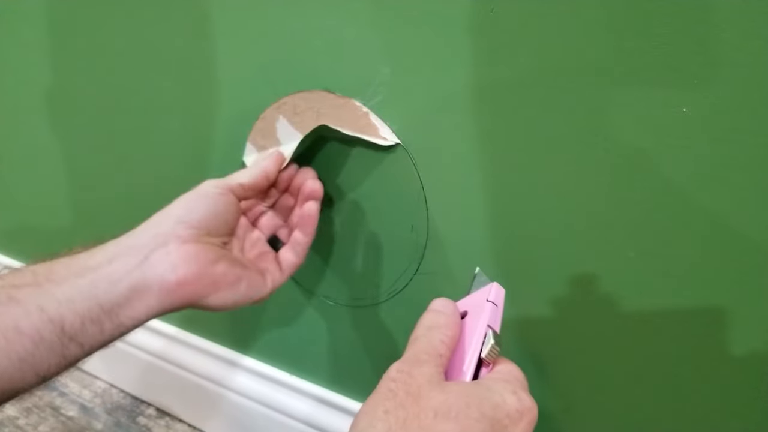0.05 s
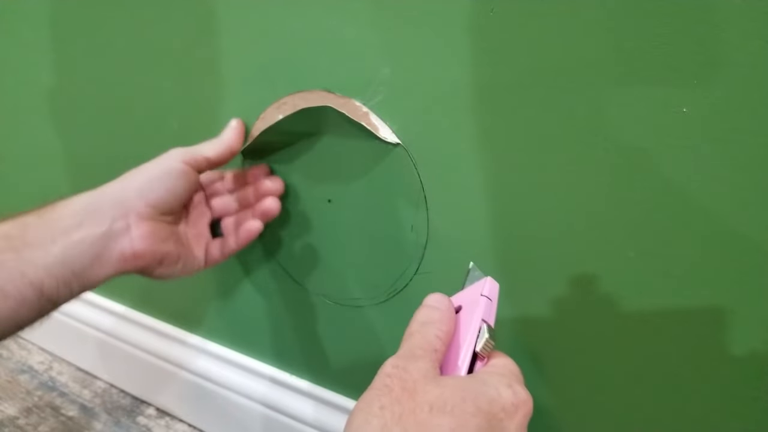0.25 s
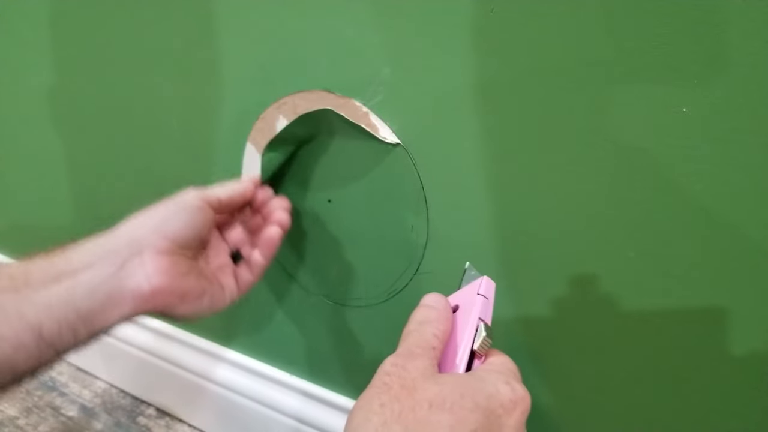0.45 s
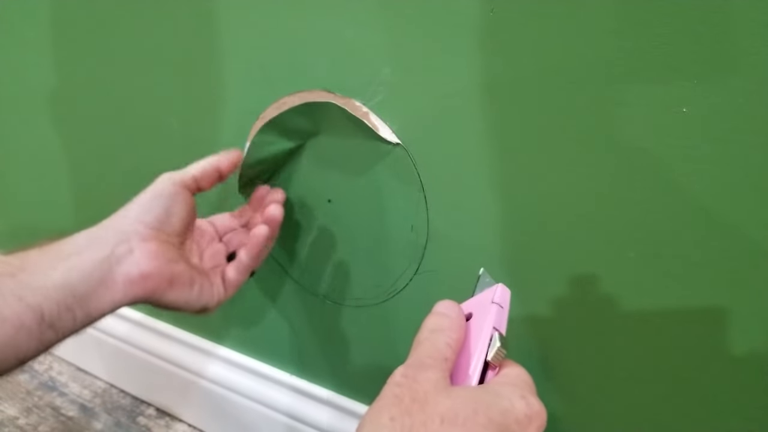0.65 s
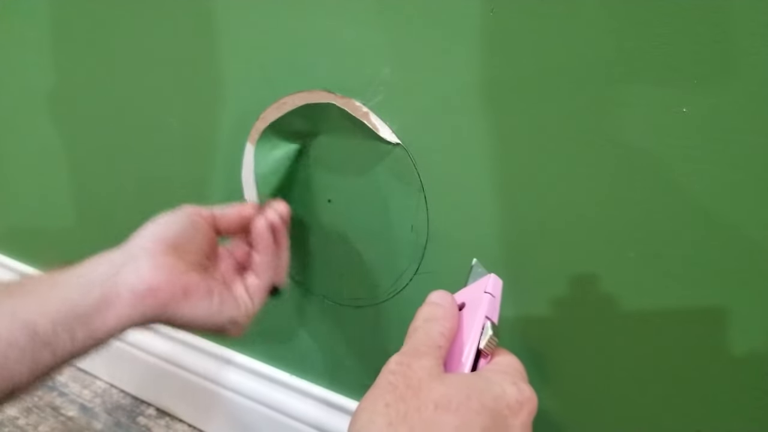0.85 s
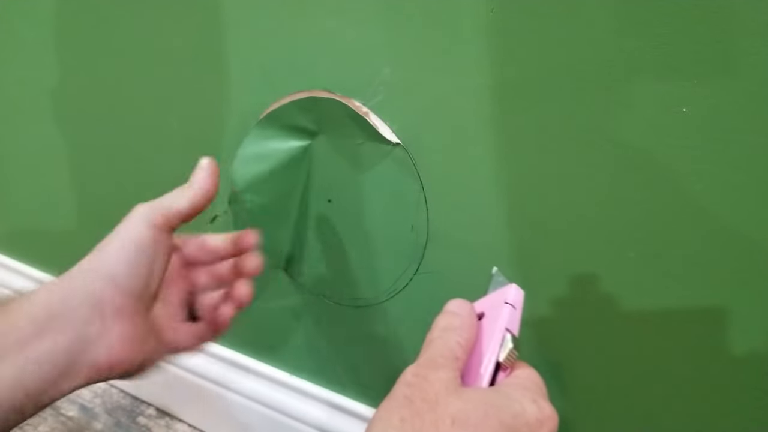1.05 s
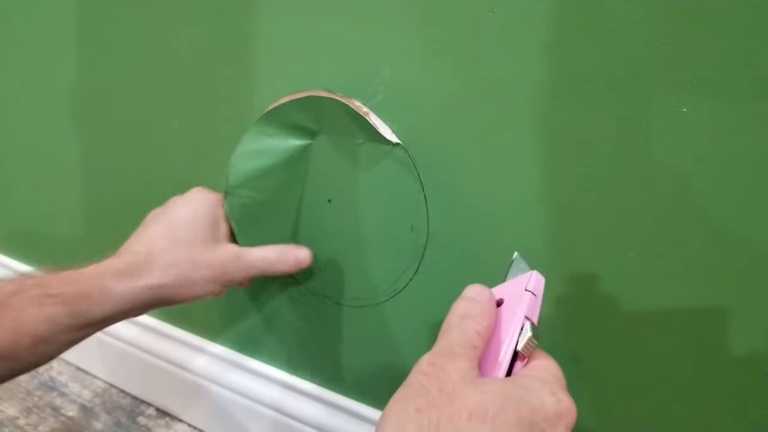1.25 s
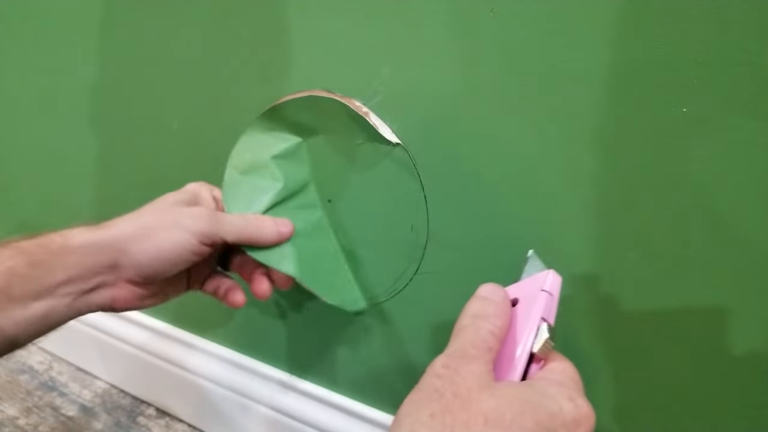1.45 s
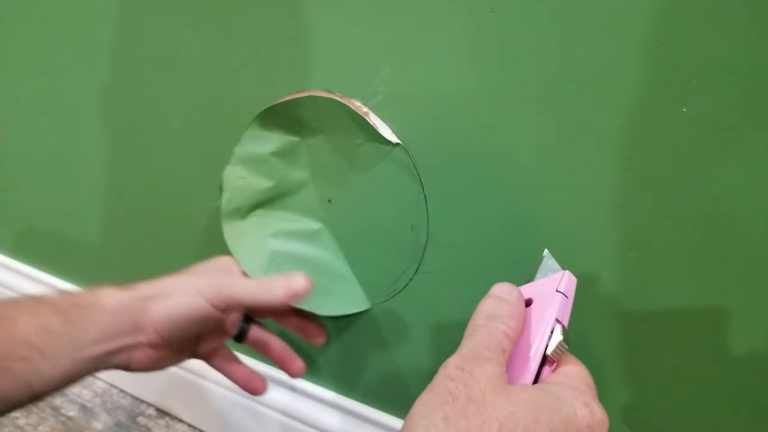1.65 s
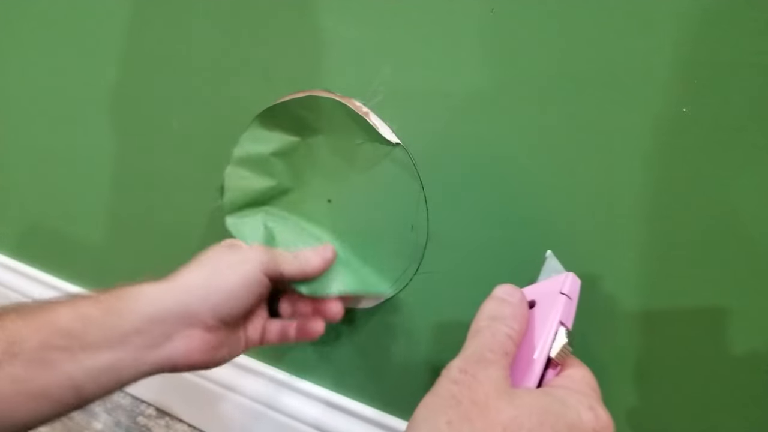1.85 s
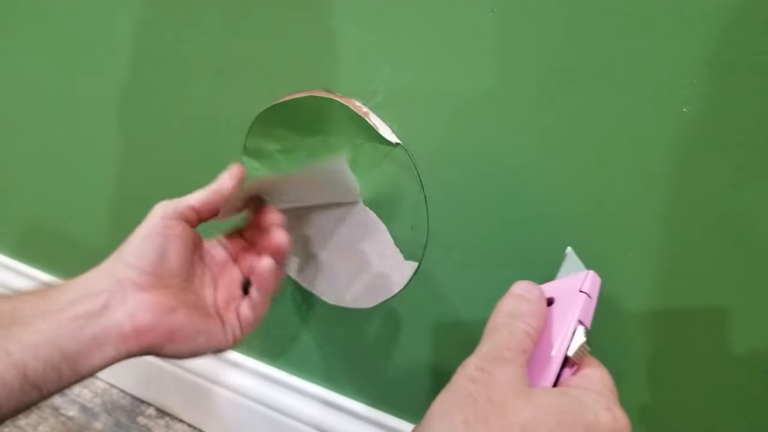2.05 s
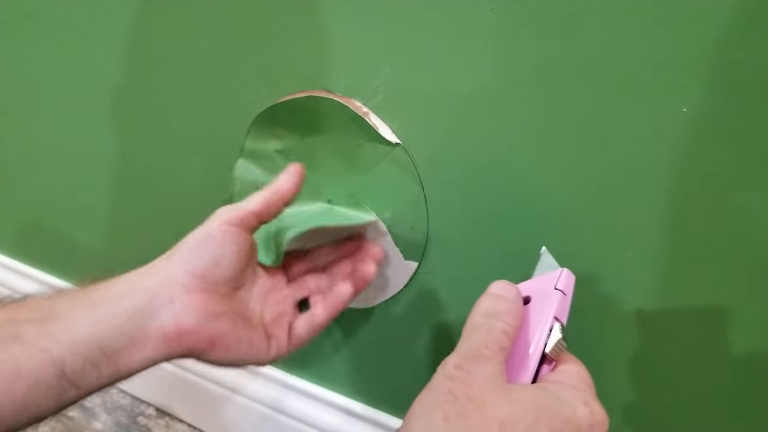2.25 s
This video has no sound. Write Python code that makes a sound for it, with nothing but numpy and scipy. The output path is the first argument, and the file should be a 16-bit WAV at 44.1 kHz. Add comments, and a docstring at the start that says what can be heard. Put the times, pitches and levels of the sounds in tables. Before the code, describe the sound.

Painted paper is torn off a drywall panel in short, jerky rips with crisp crackle, sharp snaps and dull hollow bumps of fingers, the hardest rip near the end; close phone microphone in a bare, lively room.

```python
"""Peeling paper off a plasterboard wall

The painted paper face is peeled by hand in short rips, close to a phone in a bare room.
Fibres part as dense random clicks; paint skin snaps as paired breaks with a burst of fraying noise.
Fingertips, snaps and the jerky pull ring the hollow board's modes; a loosened flap drums in the last rip.
Diffuse noise tails carry the room, over a wavering mains hum and a faint hiss."""
import sys
import numpy as np
from scipy import signal
from scipy.fft import rfft, irfft, next_fast_len
from scipy.io import wavfile
from scipy.ndimage import uniform_filter1d

SR = 44100
rng = np.random.default_rng(int(sys.argv[2]) if len(sys.argv) > 2 else 0)


def wav_out(sig):
    """Save sig, one row per channel (or a flat mono array), as 16-bit PCM at SR to the path in sys.argv[1]."""
    wavfile.write(sys.argv[1], SR, np.round(np.clip(np.atleast_2d(sig).T, -1, 1) * 32767).astype(np.int16))


def volts_from_db(level):
    """Convert decibel levels to linear amplitude ratios."""
    exponent = np.asarray(level, float) / 20
    return 10 ** exponent


N = 101429


def unit(x):
    """Scales to rms 1."""
    return x / np.sqrt(np.mean(x ** 2))


def curve(points):
    """Linear interpolation of (time [s], value) points over the scene."""
    return np.interp(np.arange(N) / SR, *np.array(points, float).T)


def colour(x, points):
    """Minimum-phase filter through (frequency [Hz], gain [dB]) points, by the folded cepstrum."""
    size = 2048
    point_hz, point_db = np.array(points, float).T
    hz = np.maximum(np.fft.rfftfreq(size, 1 / SR), 1)
    gain_db = np.interp(np.log(hz), np.log(point_hz), point_db)
    cepstrum = irfft(gain_db * np.log(10) / 20)
    cepstrum[1:size // 2] *= 2
    cepstrum[size // 2 + 1:] = 0
    impulse = irfft(np.exp(rfft(cepstrum)))[:size // 2]
    return signal.fftconvolve(x, impulse)[:len(x)]


def lowpass(x, hz, order):
    """Butterworth low-pass."""
    return signal.sosfilt(signal.butter(order, hz, fs=SR, output="sos"), x)


def highpass(x, hz, order):
    """Butterworth high-pass."""
    return signal.sosfilt(signal.butter(order, hz, "high", fs=SR, output="sos"), x)


def band(x, lo_hz, hi_hz):
    """Butterworth band-pass."""
    return signal.sosfilt(signal.butter(2, [lo_hz, hi_hz], "bandpass", fs=SR, output="sos"), x)


def resonance(x, hz, q):
    """Band-pass around a ring frequency, narrower for higher q."""
    return band(x, hz / (1 + 0.5 / q), hz * (1 + 0.5 / q))


def clicks(per_s, spread_db):
    """Random clicks, mostly small, a few large."""
    when, size, sign = rng.random(N), rng.exponential(size=N), rng.standard_normal(N)
    return unit((when < per_s / SR) * sign * volts_from_db(spread_db * size))


def walk(rate_hz):
    """Slow random drift, rms 1: noise averaged twice."""
    k = int(SR / rate_hz)
    return unit(uniform_filter1d(uniform_filter1d(rng.standard_normal(N), k), k))


# hum partials: (frequency [Hz], rms level before drift [dB])
HUM_PARTIALS = [(59.5, -47.5)]
# hum drift, with a drop midway: (time [s], gain [dB])
HUM_DRIFT = [(0, -0.5), (1.3, -1.5), (1.36, -12), (1.9, -7.5), (2.3, -4)]
# hiss spectrum: (frequency [Hz], relative density [dB])
HISS_SPECTRUM = [(30, -18), (75, 0.5), (250, -21), (500, -14), (1200, -15), (3000, -20), (6500, -23),
                 (8500, -35), (16500, -42)]
HUM_WAVER_DB, HISS_DB, HISS_SHARED_HZ = 0.5, -50.5, 900


def background():
    """A slightly wavering mains hum and a hiss that both sides share in the bass."""
    t = np.arange(N) / SR
    hum = sum(volts_from_db(db) * np.sqrt(2) * np.sin(2 * np.pi * hz * t) for hz, db in HUM_PARTIALS)
    hum = hum * volts_from_db(HUM_WAVER_DB * walk(12) + curve(HUM_DRIFT))
    mid, side = (colour(rng.standard_normal(N), HISS_SPECTRUM) for _ in range(2))
    side = highpass(side, HISS_SHARED_HZ, 1)
    hiss = mid + side * np.array([[1], [-1]])
    return hum + volts_from_db(HISS_DB) / np.std(mid) * hiss


# fine crackle spectrum: (frequency [Hz], gain [dB])
FIBRE_SPECTRUM = [(900, -29), (1700, -8), (3000, -4.5), (6800, 1), (8500, -5.5), (10500, -0.5),
                  (13000, -0.5), (16000, 2)]
FIBRES_PER_S, FIBRE_SPREAD_DB, FINE_DB = 14000, 1.5, 1


def fine_crackle(level_db):
    """Single fibres part as dense clicks of nearly even size."""
    crackle = colour(clicks(FIBRES_PER_S, FIBRE_SPREAD_DB), FIBRE_SPECTRUM)
    return unit(crackle) * volts_from_db(level_db + FINE_DB)


# coarse tearing spectrum: (frequency [Hz], gain [dB])
COARSE_SPECTRUM = [(300, -8.5), (800, 0), (1250, 1), (1550, 1), (2500, 3), (4000, 6), (6500, -3),
                   (8000, -10.5), (12000, -16.5)]
COARSE_PER_S, COARSE_SPREAD_DB, COARSE_DB = 4000, 2.4, 2


def coarse_tearing(level_db):
    """Sparser, less even clicks, coloured by the loosened flap."""
    crackle = colour(clicks(COARSE_PER_S, COARSE_SPREAD_DB), COARSE_SPECTRUM)
    return flap(unit(crackle)) * volts_from_db(level_db + COARSE_DB)


# treble balance of the pull: (time [s], gain of the jerks' fast part [dB])
JERK_TILT = [(0, -3.5), (.9, -4.5), (1.2, -3.5), (1.75, 1.5), (2.3, -0.5)]
JERKS_PER_S, JERK_SPREAD_DB, JERK_SPLIT_HZ = 2000, 1.2, 245


def pull_jerks():
    """Random jerks of the pull, their fast part tilted against the slow over time."""
    jerks = clicks(JERKS_PER_S, JERK_SPREAD_DB)
    slow, fast = lowpass(jerks, JERK_SPLIT_HZ, 2), highpass(jerks, JERK_SPLIT_HZ, 2)
    tilt = volts_from_db(curve(JERK_TILT))
    return (slow + tilt * fast) * np.sqrt(2 / (1 + tilt ** 2))


# tearing strength: (time [s], fine crackle level [dB], coarse level re fine [dB], pull level [dB])
TEAR_LEVELS = [(0, -39.5, -4.5, -43.5), (0.112, -57.5, 7, -40.5), (.18, -59.5, 8, -58),
               (.21, -62, -16, -34), (0.276, -57, 4, -42), (0.293, -37, -19.5, -34.5),
               (.312, -34.5, -14, -58), (.34, -54.5, 2, -46), (0.381, -46, -15, -34),
               (0.386, -34, -10, -33.5), (0.429, -33, 0, -29), (0.438, -29.5, 3, -39), (.47, -37, 1, -46),
               (0.501, -45.5, -5, -40.5), (.57, -56.5, 6, -80), (0.597, -36, -6, -39),
               (0.621, -60, 11, -65), (0.693, -57.5, 0, -39), (0.714, -32.5, -6, -32.5),
               (0.734, -48, 9.5, -49), (.775, -57, -8, -37), (0.788, -38, 0, -52), (0.809, -32, 2.5, -29.5),
               (.84, -28.5, -1, -27), (0.888, -26.5, -5, -34.5), (0.907, -34.5, -5.5, -40),
               (1.02, -52.5, 0.5, -70), (1.19, -69.5, 9, -73), (1.245, -64, 12, -30.5),
               (1.261, -47.5, 1, -34), (1.285, -50, 4, -36), (1.32, -39, -5, -35.5), (1.338, -40.5, 4, -35),
               (1.349, -35, 4.5, -37.5), (1.401, -32, -6, -25), (1.5, -49.5, -9, -62.5),
               (1.517, -36.5, -18, -28), (1.57, -63, 5.5, -74), (1.7, -66.5, 10, -40.5),
               (1.746, -53, 2, -37), (1.751, -46, 15.5, -20.5), (1.768, -53, -17, -48.5),
               (1.785, -37, 0.5, -18.5), (1.809, -48.5, 3, -55), (1.839, -36, -9, -64),
               (1.842, -22, -15, -32), (1.858, -36, 3, -26.5), (1.878, -31.5, -5, -20.5),
               (1.929, -32.5, -2, -46.5), (2.05, -44.5, -7.5, -51), (2.12, -63.5, 9, -48),
               (2.15, -50, -7, -62), (2.2, -72, 6, -60), (2.3, -66, 1, -36)]
OWN_FIBRES_DB, OWN_COARSE_DB, PULL_DB = 7.5, 2.5, -6  # own: crackle reaching each port by its own path


def tearing():
    """Shared crackle, each port's own crackle, and the jerky pull ringing the board."""
    t = np.arange(N) / SR
    time_s, fine_db, coarse_db, pull_db = np.array(TEAR_LEVELS, float).T
    fine_level = np.interp(t, time_s, fine_db)
    coarse_level = np.interp(t, time_s, fine_db + coarse_db)
    fine, *own_fine = (fine_crackle(fine_level) for _ in range(3))
    coarse, *own_coarse = (coarse_tearing(coarse_level) for _ in range(3))
    own = volts_from_db(OWN_FIBRES_DB) * np.array(own_fine) + volts_from_db(OWN_COARSE_DB) * np.array(own_coarse)
    jerks = pull_jerks()
    pull_gain = volts_from_db(np.interp(t, time_s, pull_db) + PULL_DB)
    pull = board(jerks * pull_gain) / np.std(board(jerks))
    return fine + coarse, own, pull


# modes of the hollow panel: (frequency [Hz], relative level [dB], t60 [s])
BOARD_MODES = [(175.5, -24, 0.023), (198.6, -3, 0.058), (243.7, -11.5, 0.11), (277.3, -2, 0.069),
               (324.3, 2.5, 0.036), (409.5, -6.5, 0.015), (626, -7, 0.01), (850, -33, 0.0043)]
BOARD_LOW_HZ = 154  # the board radiates little below


def board(force):
    """The panel's decaying modes ring under any force; impulse response peak 1."""
    t = np.arange(SR // 4) / SR
    ring = sum(volts_from_db(db) * np.sin(2 * np.pi * hz * t) * 1000. ** (-t / t60_s)
               for hz, db, t60_s in BOARD_MODES)
    ring = highpass(ring, BOARD_LOW_HZ, 4)
    return signal.fftconvolve(force, ring / np.abs(ring).max())[:N]


# room decay: (frequency [Hz], t60 [s])
ROOM_DECAY = [(100, 0.17), (400, 0.65), (1600, 0.75), (4000, 0.57), (8000, 0.59), (14000, 0.2)]
FIRST_ECHO_S, ROOM_SHARED_HZ = 0.0088, 460  # both ports hear much the same room below


def room(x):
    """A diffuse noise tail for each side, every half octave with its own decay."""
    t = np.arange(SR) / SR
    decay_hz, decay_s = np.array(ROOM_DECAY).T
    tail = np.zeros((2, SR))
    for hz in 80 * 2 ** np.arange(0, 8, 0.5):
        t60_s = np.interp(np.log(hz), np.log(decay_hz), decay_s)
        noise = band(rng.standard_normal((2, SR)), hz / 2 ** 0.48, hz * 2 ** 0.19)
        tail += noise * 1000. ** (-t / t60_s)
    shared = tail.sum(0) / np.sqrt(2)
    tail = tail + lowpass(shared - tail, ROOM_SHARED_HZ, 1)
    tail = tail * np.clip(t / FIRST_ECHO_S - 1, 0, 1)
    return signal.fftconvolve(x[None], tail / np.sqrt(np.sum(tail ** 2) / 2), axes=1)[:, :N]


# fingertip bumps: (time [s], level [dB], contact [s])
FINGER_TAPS = [(0.086, -25, 0.0063), (0.2064, -17, 0.0041), (0.229, -17.5, 0.0038), (0.286, -31, 0.003),
               (0.393, -23, 0.0031), (0.668, -14, 0.0055), (0.681, -23, 0.0037), (0.850, -17, 0.003),
               (0.890, -16.5, 0.0028), (1.211, -24.5, 0.0028), (1.304, -27, 0.0018), (1.663, -26, 0.0026),
               (1.688, -22.5, 0.0036), (1.73, -25, 0.0027), (1.872, -14.5, 0.002), (1.883, -16, 0.0017),
               (1.979, -26.5, 0.0018), (2.286, -37.5, 0.00077)]


def taps():
    """Soft half-sine pushes of a fingertip ring the board; longer contact is duller."""
    t = np.arange(999) / SR
    force = np.zeros(N + 999)
    for time_s, db, contact_s in FINGER_TAPS:
        push = np.sin(np.pi * np.minimum(t / contact_s, 1))
        start = int(time_s * SR)
        force[start:start + 999] += volts_from_db(db) * push / push.sum()
    return board(force[:N])


# flap ring, stepping in pitch and level as the tearing goes on: (start [s], ring [Hz], relative level [dB])
FLAP_RINGS = [(.432, 1700, 0), (.69, 1900, -12), (.8, 1900, 0), (.88, 1750, -9), (1.34, 2300, -2),
              (1.375, 1900, -7), (1.84, 2150, -5)]
FLAP_Q = 3.75


def flap(x):
    """The loosened flap adds one papery ring, stepping in pitch and level as the tearing goes on."""
    t = np.arange(N) / SR
    ends = [row[0] for row in FLAP_RINGS[1:]] + [N]
    out = x
    for (start_s, hz, db), end_s in zip(FLAP_RINGS, ends):
        stretch = x * ((t >= start_s) & (t < end_s))
        out = out + volts_from_db(db) * np.sqrt(FLAP_Q) * resonance(stretch, hz, FLAP_Q)
    return out


# paint skin snaps: (time [s], level [dB], ring [Hz], edge level re ring [dB], gap to second break [s])
PAINT_SNAPS = [(0.4323, -4.5, 1770, 6, 0.0017), (0.7887, -6, 2970, -12, 0.0003),
               (0.7898, -7, 3040, -14, 0.00031), (1.258, -16.5, 2130, 5.5, .002),
               (1.3271, -12.5, 1000, 3, 0.0018), (1.3409, -4, 2140, -0.5, .0015),
               (1.5125, -20, 1950, 0, .002), (1.7333, -30, 1530, 4, 0.0021),
               (1.7502, -13, 1820, 3, 0.00201), (1.7756, -12, 7300, -6, 0.0015),
               (1.786, -16, 900, 1, 0.00198), (1.8184, -18, 1280, 2, 0.0011), (1.8417, -8, 3800, 12, .002),
               (1.8426, -8, 2190, -6, 0.00068), (1.921, -8.5, 6550, -1, 0.00123),
               (2.286, -29, 2030, 3, .002)]
SNAP_Q, SECOND_DB, FRAY_S = 2.1, 3.5, 0.0024  # second break re first; how long the edge frays
SNAP_LOW_HZ, SNAP_TOP_HZ = 1060, 6440
SNAP_THUD_DB, SNAP_OWN_DB = -24.5, -3.5  # knock on the board; edge reaching each port by its own path


def snaps():
    """Two quick breaks ring the flap and knock the board; fraying noise gives the bright edge."""
    size = 2048
    t = np.arange(size) / SR
    out, force = np.zeros((3, N + size)), np.zeros(N)
    for time_s, db, hz, bright_db, gap_s in PAINT_SNAPS:
        start = int(time_s * SR)
        breaks = np.zeros(size)
        breaks[[0, int(gap_s * SR)]] = [1, -volts_from_db(SECOND_DB)]
        ring = resonance(breaks, hz, SNAP_Q)
        edge = rng.standard_normal((3, size)) * np.exp(-(t / FRAY_S) ** 2)
        for _ in range(2):  # twice for steeper slopes
            edge = band(edge, SNAP_LOW_HZ, SNAP_TOP_HZ)
        edge = edge / np.linalg.norm(edge, axis=1, keepdims=True)
        snap = volts_from_db(bright_db) * edge * np.linalg.norm(ring)
        snap[0] += ring  # row 0 shared, rows 1-2 one per port
        out[:, start:start + size] += volts_from_db(db) * snap / np.abs(snap[0]).max()
        force[start] = volts_from_db(db + SNAP_THUD_DB)
    return out[0, :N], volts_from_db(SNAP_OWN_DB) * out[1:, :N], board(force)


# big flap of the last rip, mostly lower as it comes free: (time [s], centre [Hz], level [dB])
BELLY_GLIDE = [(1.841, 700, -37), (1.868, 610.5, -40), (1.878, 451, -30), (1.916, 295.3, -35.5),
               (1.951, 332.5, -37), (1.98, 320, -45)]
BELLY_WIDTH_HZ, BELLY_STEADY = 74, 1.1


def belly():
    """A narrow ring made shaky by slow noise, sliding mostly down with the growing flap."""
    t = np.arange(N) / SR
    time_s, hz, db = np.array(BELLY_GLIDE, float).T
    shake = unit(lowpass(rng.standard_normal((2, N)), BELLY_WIDTH_HZ / 2, 2))
    phase = 2 * np.pi * np.cumsum(np.interp(t, time_s, hz)) / SR
    ring = unit((BELLY_STEADY + shake[0]) * np.sin(phase) + shake[1] * np.cos(phase))
    active = (t > time_s[0]) & (t < time_s[-1])
    return ring * volts_from_db(np.interp(t, time_s, db)) * active


FLOOR_ECHO_S, FLOOR_ECHO_DB = 0.0096, -12
ROOM_DB, SNAP_ROOM_DB, BOARD_ROOM_DB = -5, -4.5, -6
LEFT_DB, BOARD_LEFT_DB, RIGHT_LAG_S = 2.5, 2.5, 0.00011  # left re right; further board gain at left


def scene():
    """The wall is nearer the left port: louder and earlier there."""
    crackle, own, pull = tearing()
    cracks, edges, knocks = snaps()
    panel = pull + knocks + taps() + belly()
    floor_echo = volts_from_db(FLOOR_ECHO_DB) * np.roll(cracks, int(FLOOR_ECHO_S * SR))
    near = crackle + panel + cracks + floor_echo
    size = next_fast_len(N + 64)
    lag = np.exp(-2j * np.pi * np.fft.rfftfreq(size, 1 / SR) * RIGHT_LAG_S)  # fractional delay
    late = irfft(rfft(near, size) * lag, size)[:N]
    direct = np.array([near, late]) + own + edges
    direct[0] += panel * (volts_from_db(BOARD_LEFT_DB) - 1)
    wet = room(volts_from_db(ROOM_DB) * crackle + volts_from_db(SNAP_ROOM_DB) * cracks + volts_from_db(BOARD_ROOM_DB) * panel)
    return (direct + wet) * volts_from_db(LEFT_DB / 2 * np.array([[1], [-1]])) + background()


def roll_off(x):
    """The treble ends steeply here."""
    return signal.sosfilt(signal.butter(12, 16820, fs=SR, output="sos"), x)


# microphone response: (frequency [Hz], gain [dB])
MIC_RESPONSE = [(6500, 1), (7200, 0.5), (8000, -4.5), (8800, -5.5), (10500, -2.5), (12000, 1.5),
                (14500, -2), (16000, -4)]
MIC_TOP_HZ, MIC_LOW_HZ = 15790, 45


def record(dry):
    """The phone dips near 9 kHz and cuts the top and the deepest bass."""
    heard = np.array([colour(x, MIC_RESPONSE) for x in dry])
    heard = signal.sosfilt(signal.ellip(12, 0.5, 80, MIC_TOP_HZ, fs=SR, output="sos"), heard)
    heard = highpass(heard, MIC_LOW_HZ, 2)
    return roll_off(heard)


dry = scene()
out = record(dry)
wav_out(out)
```